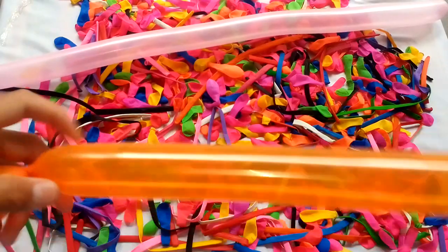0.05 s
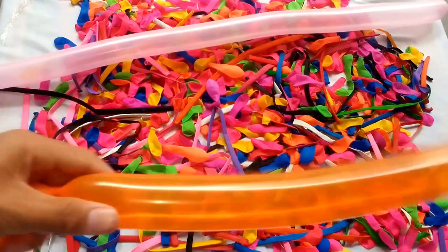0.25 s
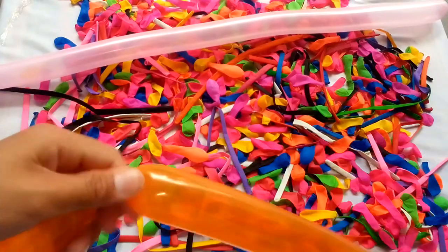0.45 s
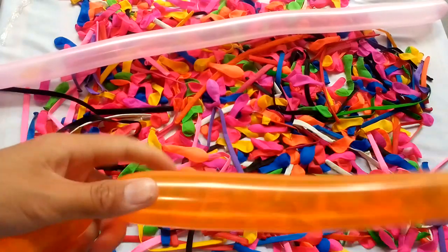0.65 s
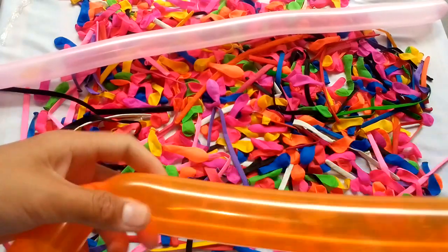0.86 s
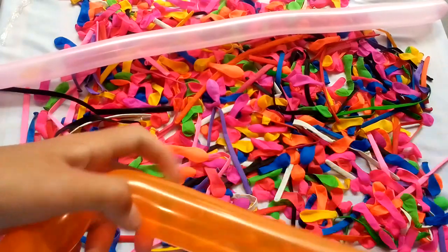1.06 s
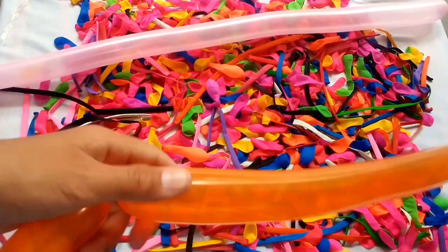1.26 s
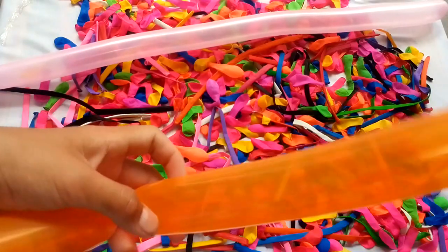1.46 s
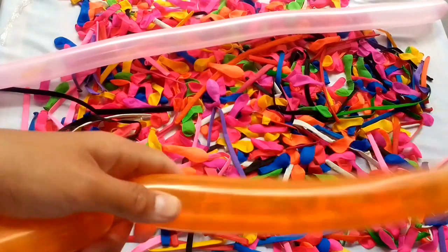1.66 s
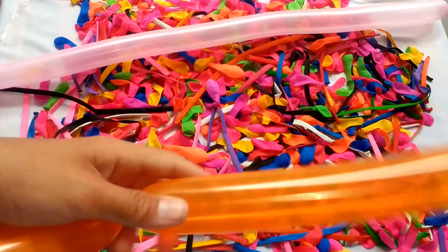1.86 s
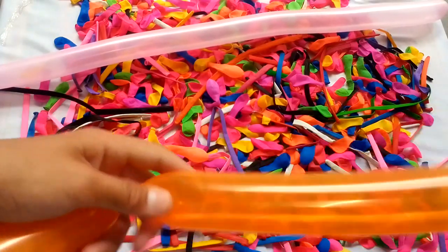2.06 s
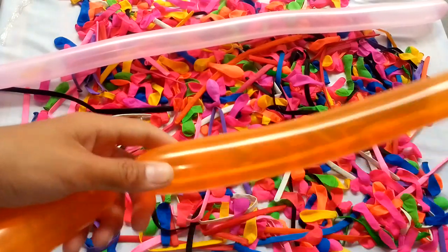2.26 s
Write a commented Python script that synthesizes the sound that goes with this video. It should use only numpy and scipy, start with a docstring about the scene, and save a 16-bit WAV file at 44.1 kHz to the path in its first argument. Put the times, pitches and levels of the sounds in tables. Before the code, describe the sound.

Close up in a small, quiet room, a hand rubs and twists an inflated rubber balloon. It gives two scratchy, wavering squeals, then uneven creaks and snaps with faint hollow hums, and squeals once more before creaking softly.

```python
"""A long inflated latex balloon, gripped and twisted by fingers, heard close up in a small room.
Stick-slip friction drives its skin: single slips snap, runs of slips creak, and in a fast slide
they fuse into a rough, gliding squeal. These sounds scatter over the skin, echo along the tube of air
and die away in the room. Soft pushes set the enclosed air humming, over a faint hiss."""
import sys
import numpy as np
from scipy import signal
from scipy.fft import rfft, irfft
from scipy.io import wavfile
from scipy.ndimage import uniform_filter1d

SR = 44100
rng = np.random.default_rng(int(sys.argv[2]) if len(sys.argv) > 2 else 0)


def transcribe(signal):
    """Save signal, clipped to [-1, 1], as a 16-bit WAV file at the path in sys.argv[1]."""
    frames = np.atleast_2d(signal).T
    limited = np.clip(frames, -1, 1)
    pcm = np.round(limited * 32767).astype(np.int16)
    wavfile.write(sys.argv[1], SR, pcm)


N = 101429


def from_db(db):
    """Amplitude ratio: tenfold for every 20 dB."""
    return 10 ** (np.asarray(db) / 20)


def unit_rms(x):
    """Normalisation to unit mean power."""
    return x / np.sqrt(np.mean(x ** 2) + 1e-20)


def at_hz(points, hz):
    """Interpolation on a logarithmic frequency axis."""
    freqs, values = np.transpose(points)
    return np.interp(np.log(hz + 1), np.log(freqs), values)


def drift(corner_hz):
    """Random fluctuation: low-passed Gaussian noise of unit power."""
    pole = np.exp(-2 * np.pi * corner_hz / SR)
    smooth = signal.lfilter([1], [1, -2 * pole, pole * pole], rng.standard_normal(2 * N))
    return unit_rms(smooth[N:])


def minimum_phase(db_at, size=4096):
    """Causal impulse response of a magnitude spectrum, by folding the cepstrum."""
    hz = np.fft.rfftfreq(size, 1 / SR)
    cepstrum = irfft(np.log(from_db(db_at(hz))))
    cepstrum[1:size // 2] *= 2
    cepstrum[size // 2 + 1:] = 0
    return irfft(np.exp(rfft(cepstrum)))


def coloured(x, spectrum):
    """Linear filtering: convolution with the impulse response of a tabulated spectrum."""
    return signal.fftconvolve(x, minimum_phase(lambda hz: at_hz(spectrum, hz)))[:len(x)]


def add(out, start_s, x):
    """Superposition of a sound from a given time onward."""
    start = max(int(start_s * SR), 0)
    out[start:start + len(x)] += x[:max(N - start, 0)]


# Spectrum of a slip. Each row: frequency in Hz, gain in dB.
SLIP_SPECTRUM = [(100, -42.5), (200, -22), (400, -12.5), (780, -15.5), (1000, -10), (1330, -16.5),
                 (1650, -15), (2500, -5.5), (3150, -1.5), (3750, -1), (5500, -1.5), (15000, -17.5)]
# The two bands that the grip alters. Each row: frequency in Hz, share of the band's gain in dB.
BASS_BAND = [(1100, 1), (1700, 0)]
MID_BAND = [(1100, 0), (1700, 1), (2400, 1), (3500, 0)]
# Modes of a pinched air pocket. Each row: multiple of its resonance frequency, share of its boost.
POCKET_MODES = [(1, 1), (2, 0.33), (3, 0.8)]
# Stretch of the skin under the grip. Each row: time in seconds, skin resonance in Hz, low edge in Hz,
# fizz above the top edge in dB.
SKIN_STRETCH = [(0, 3280, 230, 3.5), (0.121, 3920, 230, 1.5), (0.471, 3695, 450, -1.5),
                (.985, 4130, 400, -7), (1.02, 3590, 400, 0.5), (1.166, 3990, 380, -0.5),
                (1.35, 3860, 500, 0.5), (1.441, 3565, 520, 5.5), (1.5, 4040, 430, 1), (1.74, 3300, 480, -1),
                (1.8, 3820, 560, 2.5), (2.25, 3810, 620, 4)]


def slip_pulse(time_s, bass_db, mid_db, top_hz, pocket_hz=1000, pocket_db=0):
    """Source and filter: stretched skin and air pocket shape one slip into a pulse of unit energy."""
    ring_db, ring_width_hz = 8.5, 442
    pocket_width = .14  # share of the pocket's frequency
    low_cut_db, low_cut_octaves = 20, .65
    top_cut_db, top_width_hz = 39, 910
    times, *columns = np.transpose(SKIN_STRETCH)
    ring_hz, low_hz, fizz_db = (np.interp(time_s, times, column) for column in columns)

    def db_at(hz):
        grip = bass_db * at_hz(BASS_BAND, hz) + mid_db * at_hz(MID_BAND, hz)
        ring = ring_db / (1 + ((hz - ring_hz) / ring_width_hz) ** 2)
        pocket = sum(share * pocket_db / (1 + ((hz / pocket_hz - multiple) / pocket_width) ** 2)
                     for multiple, share in POCKET_MODES)
        low_cut = low_cut_db * np.clip(np.log2(low_hz / (hz + 1)) / low_cut_octaves, 0, 1)
        above_top = np.maximum(hz - top_hz, 0) / top_width_hz
        top_cut = (top_cut_db - fizz_db) * (1 - np.exp(-above_top ** 2))
        return at_hz(SLIP_SPECTRUM, hz) + grip + ring + pocket - low_cut - top_cut
    pulse = minimum_phase(db_at)
    return pulse / np.linalg.norm(pulse)


# Runs of slips. Each row: start in seconds, length in seconds, slips per second, unevenness from 0 to 1,
# first, halfway and last levels in dB, bass and mid-band gains in dB, top edge in Hz,
# pocket resonance in Hz, its boost in dB.
SLIP_RUNS = [ (.007, 0.052, 580, .6, -48.5, -45, -47, -25, -10.5, 3970, 1026, 17),
             (0.0436, 0.024, 573, 0.08, -34, -39, -39, -15, -13, 3640, 1005, 14.5),
             (0.086, 0.055, 273, 0.51, -34.5, -54, -44.5, -24, -13.5, 3840, 1020, 12.5),
             (.121, 0.032, 350, 0.58, -39.5, -48.5, -34.5, -15, -6, 4100, 1076, 15.5),
             (0.16, 0.038, 544, .4, -52, -44.5, -35, -10, -14.5, 3700, 2080, 15.5),
             (.232, 0.078, 406, 0.47, -42, -36.5, -36, -15, -6, 4400, 2150, 14),
             (.451, 0.043, 643, 0.39, -31, -23, -29, -11.5, -4, 4220, 950, 9),
             (.497, 0.091, 375, 0.68, -36, -44, -41.5, 3, 4, 4950, 494.3, 5),
             (0.615, 0.057, 464, 0.51, -39, -30.5, -39.5, 3, -6, 5000, 2400, 7.5),
             (0.786, 0.029, 370, 0.39, -39.5, -31, -47, 3.5, -0.5, 5260, 2250, 11),
             (0.852, 0.071, 290, 0.48, -37.5, -46, -46.5, -0.5, -14, 5090, 660, 9),
             (0.976, 0.022, 450, 0.15, -22.5, -26.5, -28.5, -9, 1.5, 5050, 2110, -2.5),
             (1.003, 0.028, 635, 0.52, -29, -28.5, -27.5, 5, 3, 4920, 984, 2),
             (1.03, 0.084, 530, 0.29, -24.5, -26, -37, -6.5, 2.5, 4905, 2870, 0.5),
             (1.112, 0.0096, 690, .3, -28.5, -22.5, -24, 3, 3, 4750, 990, 2.5),
             (1.1522, 0.026, 317, 0.13, -24.5, -21, -34.5, -0.5, -0.5, 5000, 3900, 4.5),
             (1.185, 0.06, 240, 0.54, -42, -61, -61, -5, -11.5, 4700, 362, 9),
             (1.302, .011, 710, 0.16, -44, -34, -33, -1.5, 11.5, 4400, 2260, -3.5),
             (1.333, .036, 660, 0.47, -40.5, -25.5, -33, -3, 2.5, 4340, 550, 6),
             (1.372, 0.046, 312, 0.45, -36, -32.5, -59, -1.5, 2, 4450, 547, 9.5),
             (1.429, 0.034, 810, .5, -34.5, -30, -28.5, 6.5, 5.5, 4410, 2590, 6),
             (1.46, 0.032, 710, 0.52, -27.5, -28, -21.5, -1.5, 2, 4550, 1040, 7),
             (1.5, 0.053, 382, 0.54, -34.5, -31, -30.5, -1, 3, 4650, 3070, 3.5),
             (1.559, 0.044, 473, 0.66, -34, -41, -33, 3, 2.5, 4780, 3000, 12),
             (1.612, 0.058, 520, 0.53, -37.5, -46, -55, -11.5, -1, 4400, 2690, 17),
             (1.754, 0.091, 372, 0.67, -42, -32, -31, -5, -6.5, 4510, 1635, 8.5),
             (1.923, .024, 550, .25, -36.5, -44, -22.5, 2.5, 7, 5050, 1030, 2.5),
             (1.977, .048, 510, .5, -34, -29.5, -38.5, 8, 6.5, 5180, 1570, 10),
             (2.024, 0.044, 476, 0.62, -36, -37.5, -46, 0.5, 7.5, 4900, 1640, 3),
             (2.072, 0.077, 400, 0.49, -41.5, -50.5, -58, -8.5, -3, 4800, 1590, 10),
             (2.211, 0.058, 500, 0.68, -38.5, -39, -44.5, -8.5, 8.5, 4300, 2530, -3)]


def creaks(max_slips=128, spread_db=1):
    """Stick-slip friction: an uneven pulse train whose rate and force follow the finger."""
    out = np.zeros(N)
    for start_s, length_s, rate, uneven, first_db, halfway_db, last_db, *grip in SLIP_RUNS:
        gap_draws, size_draws = rng.standard_normal((2, max_slips))
        progress = np.linspace(0, 1, int(length_s * SR))
        gaps = np.exp(uneven * gap_draws - uneven ** 2 / 2)  # log-normal, with a mean of one period
        onsets = np.searchsorted(rate * length_s * progress, np.cumsum(gaps) - gaps[0])
        onsets = onsets[onsets < len(progress)]
        slips = np.zeros(len(progress))
        slips[onsets] = unit_rms(from_db(spread_db * uneven * size_draws[:len(onsets)]))
        force = from_db(np.interp(progress, [0, .5, 1], [first_db, halfway_db, last_db]))
        drive = slips * force * np.sqrt(SR / rate)  # power independent of the slip rate
        add(out, start_s, signal.fftconvolve(drive, slip_pulse(start_s + length_s / 2, *grip)))
    return out


# Lone slips. Each row: start in seconds, peak in dB, bass and mid-band gains in dB, top edge in Hz.
SINGLE_SLIPS = [(0.0864, -25.5, -7, -5.5, 3990), (0.6439, -13, -15.5, -9.5, 4900),
                (.9045, -11.5, -10.5, -4, 4870), (0.9457, -16.5, 0.5, -4, 4830),
                (0.952, -17.5, -10, -2, 5080), (.9580, -15.5, -13.5, 3.5, 5030),
                (0.9655, -15, 3, 0.5, 5040), (0.9714, -15.5, -0.5, -6, 5030),
                (1.1280, -18.5, 10.5, 3.5, 4850), (1.5314, -15, -14.5, -0.5, 4650),
                (1.564, -15, 4.5, 1, 4820), (1.5751, -9.5, -7.5, 2.5, 4910), (1.5849, -12, -5.5, -2, 5200),
                (1.6018, -9.5, -3.5, 2, 4880), (1.6794, -22.5, -1, -0.5, 4400),
                (1.703, -23, 11.5, 15.5, 3800), (1.7128, -30.5, 14, 16, 3900),
                (1.7255, -18.5, 1.5, 11.5, 4000), (1.7267, -24.5, 1.5, 6, 4000),
                (1.7346, -16.5, 1, 7, 4100), (1.7370, -13.5, 4.5, 11.5, 4100), (1.7415, -13.5, 4, 15, 4200),
                (1.7442, -14.5, 2.5, 5.5, 4200), (1.7487, -10.5, 4, 13.5, 4200), (1.75, -16, 5, 1.5, 4200),
                (2.188, -26.5, -8, 9, 4650)]


def snaps():
    """Impulsive excitation: the rubber holds, then lets go once."""
    out = np.zeros(N)
    for start_s, peak_db, *grip in SINGLE_SLIPS:
        pulse = slip_pulse(start_s, *grip)
        add(out, start_s, from_db(peak_db) * pulse / np.abs(pulse).max())
    return out


def sliding_contact(hz, roughness, flutter_db=1.5):
    """Amplitude modulation: a sliding patch of skin gives a unit-power tone that roughness flutters."""
    flutter = from_db(roughness * flutter_db * drift(corner_hz=300))
    local_power = uniform_filter1d(flutter ** 2, size=600)
    phase = 2 * np.pi * np.cumsum(hz) / SR
    return flutter * np.sqrt(2 / local_power) * np.sin(phase)


# Fast slides, one list per twist. Each row: time in seconds, centre pitch in Hz, drive level in dB,
# roughness from 0 to about 1.
SLIDES = [
    [(.230, 3677, -46, 0.26), (.248, 3803, -25, 0), (.268, 4206, -30.5, 0.53), (.295, 3800, -26.5, 0.92),
     (.315, 4290, -24, 0.59), (.333, 3914, -31, 0.84), (.346, 3632, -21.5, 0.34), (.372, 5084, -21.5, 0.52),
     (.384, 3740, -26, 0.79), (.415, 3776, -27, 0.43), (.452, 3774, -31, 1), (.49, 4315, -34.5, 0.96)],
    [(.595, 3714, -42, 0.31), (.616, 3625, -34.5, 0.31), (.627, 3830, -20.5, 0.2),
     (.637, 4652, -25.5, 0.24), (.652, 5420, -32, 0.63), (.667, 4630, -17, 0.31), (.676, 4650, -18.5, 0.2),
     (.685, 3635, -23, 0.59), (.703, 4310, -24, 0.63), (.722, 3574, -19.5, 0.39), (.735, 4686, -18.5, 0.58),
     (.753, 5450, -19.5, 0.37), (.766, 3822, -19, 0.4), (.803, 3764, -28, 0.8), (.818, 3647, -20, 0.26),
     (.838, 4722, -22.5, 0.69), (.860, 4110, -29, 0.69), (.935, 3937, -37, 1)],
    [(1.788, 3724, -35.5, 0.25), (1.805, 3764, -21, 0.15), (1.818, 4713, -25, 0.27),
     (1.836, 5277, -41, 0.64), (1.850, 4865, -21, 0.37), (1.860, 4792, -19, 0.23), (1.868, 3785, -23, 0.65),
     (1.895, 4090, -29.5, 0.84), (1.911, 3547, -19.5, 0.42), (1.923, 4848, -17, 0.24),
     (1.940, 4625, -26, 0.74), (1.957, 3805, -19.5, 0.53), (1.975, 4168, -29.5, 1.03),
     (2.060, 4076, -37.5, 0.65)],
]
# Each twist stretches the skin differently. Each entry: top edge of one slide in Hz.
SLIDE_TOPS_HZ = [5240, 5550, 5350]
# Spectra of the squeal and of the skin it shakes. Each row: frequency in Hz, gain in dB.
SQUEAL_SPECTRUM = [(100, -53), (350, -35.5), (1000, -28.5), (1400, -32), (2000, -18.5), (2800, -9),
                   (3200, -7.5), (3500, 1), (4200, -2), (4650, -1), (5500, -4.5), (6100, 0), (6280, -23),
                   (7500, -40.5), (10000, -30), (15000, -26.5)]
SHAKEN_SKIN_SPECTRUM = [(100, -48), (190, -21.5), (240, -9), (330, -21.5), (600, 5.5), (830, -2), (1050, 3),
                        (1250, -16.5), (1500, -24.5), (2100, 0.5), (3000, 4), (6000, -30)]


def squeals():
    """Friction-driven oscillation: rapid slips fuse into one pitch at the finger, one at the thumb."""
    regrips_per_s, regrip_uneven, regrip_sweep_hz = 110, .39, 1470
    finger_db, finger_wobble_hz, wobble_corner_hz = -3.5, 437, 560
    thumb_db, thumb_hz, thumb_wobble_hz, thumb_follows = -1, 4660, 657.3, .42
    top_width_hz, above_top_db, shaken_db = 36, -11.5, -36.5
    t = np.arange(N) / SR
    tone, shake = np.zeros((2, N))
    for slide, top_hz in zip(SLIDES, SLIDE_TOPS_HZ):
        times, *columns = np.transpose(slide)
        hz, db, roughness = (np.interp(t, times, column) for column in columns)
        sliding = 1. * ((t > times[0]) & (t < times[-1]))
        force = from_db(db) * uniform_filter1d(sliding, size=200)
        # The pitch zigzags with each fresh grip, rising for 70% of the cycle.
        regrip_rate = regrips_per_s * np.exp(regrip_uneven * drift(regrips_per_s))
        zigzag = .5 * signal.sawtooth(2 * np.pi * np.cumsum(regrip_rate) / SR, width=.7)
        swing_hz = regrip_sweep_hz * zigzag + finger_wobble_hz * drift(wobble_corner_hz)
        finger = sliding_contact(hz + roughness * swing_hz, roughness)
        thumb_glide_hz = thumb_hz + thumb_follows * (hz - thumb_hz)
        thumb = sliding_contact(thumb_glide_hz + thumb_wobble_hz * drift(wobble_corner_hz), roughness)
        both = force * (from_db(finger_db) * finger + from_db(thumb_db) * roughness * thumb)
        tone += coloured(both, [(top_hz, 0), (top_hz + top_width_hz, above_top_db)])
        shake += force
    skin_noise = unit_rms(coloured(rng.standard_normal(N), SHAKEN_SKIN_SPECTRUM))
    return coloured(tone, SQUEAL_SPECTRUM) + from_db(shaken_db) * shake * skin_noise


# Pushes of the hand. Each row: start in seconds, pitch in Hz, glide in Hz, level of the decay at its
# start in dB, swell time constant in seconds, time to fall 60 dB in seconds.
PUSHES = [(.28, 236, -1, -52.5, 0.0088, 0.15), (1.0, 1120, -200, -30, 0.012, .1),
          (1.108, 957, -1.5, -48, 0.0077, 0.049), (1.165, 351, -3, -47, 0.0059, 0.23),
          (1.22, 673, -0.5, -52.5, 0.06, 0.59), (1.342, 533, -20.5, -30, 0.019, .13),
          (1.461, 987, 73, -26.5, 0.015, 0.086), (1.574, 446, -79, -47, 0.0076, 0.19)]


def air_hums(size=16000, glide_s=.04):
    """Air-column resonance: a soft push rings one damped mode, whose pitch shifts with the pinch."""
    out, t = np.zeros(N), np.arange(size) / SR
    for start_s, hz, glide_hz, db, swell_s, t60_s in PUSHES:
        pitch_hz = hz + glide_hz * np.minimum(t / glide_s, 1)
        envelope = from_db(db - 60 * t / t60_s) * (1 - np.exp(-t / swell_s))
        add(out, start_s, envelope * np.sin(2 * np.pi * np.cumsum(pitch_hz) / SR))
    return out


def skin_scatter(x, size=2048, t60_s=.015, level_db=-7.5):
    """Scattering: waves spread over the skin and add a brief, dense tail."""
    tail = rng.standard_normal(size) * from_db(-60 * np.arange(size) / SR / t60_s)
    return x + from_db(level_db) * signal.fftconvolve(x, tail / np.linalg.norm(tail))[:N]


def tube_echoes(x, round_trip_s=.00799, trip_gain=.45, first_echo_db=-12):
    """Comb filtering: waves reflect back and forth along the tube, weaker on every trip."""
    delay = np.exp(-2j * np.pi * np.fft.rfftfreq(2 * N, 1 / SR) * round_trip_s)
    echoes = irfft(rfft(x, 2 * N) * delay / (1 - trip_gain * delay))[:N]
    return x + from_db(first_echo_db) * echoes


# Decay of the room. Each row: frequency in Hz, time to fall 60 dB in seconds.
REVERB_TIMES = [(300, 0.55), (1000, 0.4), (2500, 0.33), (4000, 0.23), (8000, 0.24)]
CUTOFF_HZ = 15800


def room_reverb(x, size=20000, delay_s=.004, level_db=-10):
    """Reverberation: a diffuse field decays exponentially, most slowly in the bass."""
    t, tail = np.arange(size) / SR, np.zeros(size)
    edges_hz = np.geomspace(100, CUTOFF_HZ, 8)
    for low, high in zip(edges_hz, edges_hz[1:]):
        bandpass = signal.butter(2, [low, high], "band", fs=SR, output="sos")
        t60_s = at_hz(REVERB_TIMES, np.sqrt(low * high))
        tail += signal.sosfilt(bandpass, rng.standard_normal(size)) * from_db(-60 * t / t60_s)
    tail *= t > delay_s
    return from_db(level_db) * signal.fftconvolve(x, tail / np.linalg.norm(tail))[:N]


# Spectrum of the background. Each row: frequency in Hz, relative level in dB.
HISS_SPECTRUM = [(25, 4.5), (60, -4.5), (100, 9.5), (150, -2), (400, 4), (2000, -1), (8000, -8),
                 (15000, -13.5)]


def hiss(level_db=-78):
    """Stationary noise: a faint, steady floor, strongest in the bass."""
    return from_db(level_db) * unit_rms(coloured(rng.standard_normal(N), HISS_SPECTRUM))


def scene():
    """Superposition in one channel: the rubbed balloon, its reverberation, the hums and the hiss."""
    friction = creaks() + snaps() + squeals()
    rubber = tube_echoes(skin_scatter(friction))
    return (rubber + hiss() + room_reverb(rubber) + air_hums())[None]


def record(dry):
    """Band limiting: a steep elliptic low-pass removes the highest treble."""
    return signal.sosfilt(signal.ellip(10, .1, 70, CUTOFF_HZ, fs=SR, output="sos"), dry)


dry = scene()
out = record(dry)
transcribe(out)
```